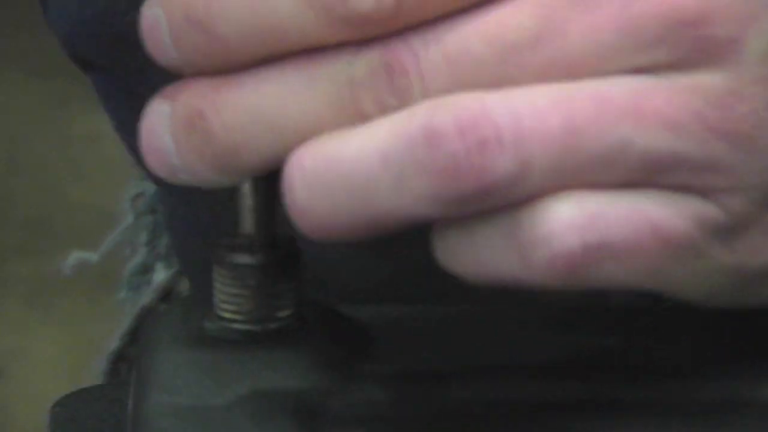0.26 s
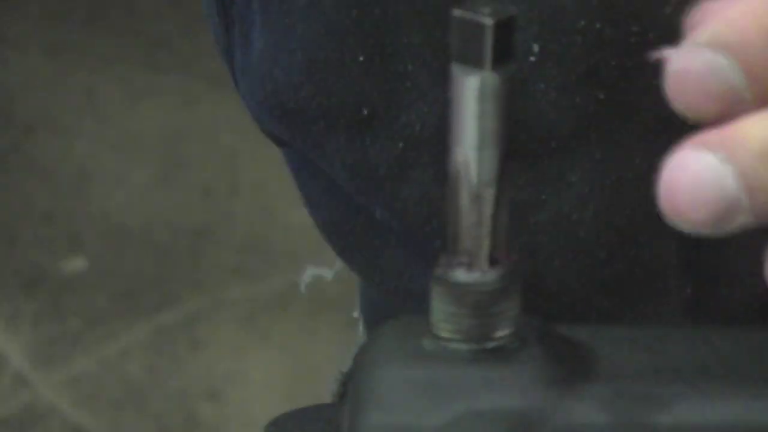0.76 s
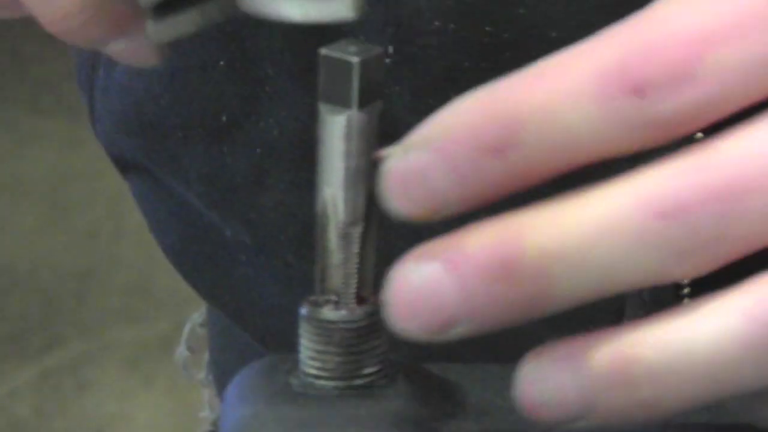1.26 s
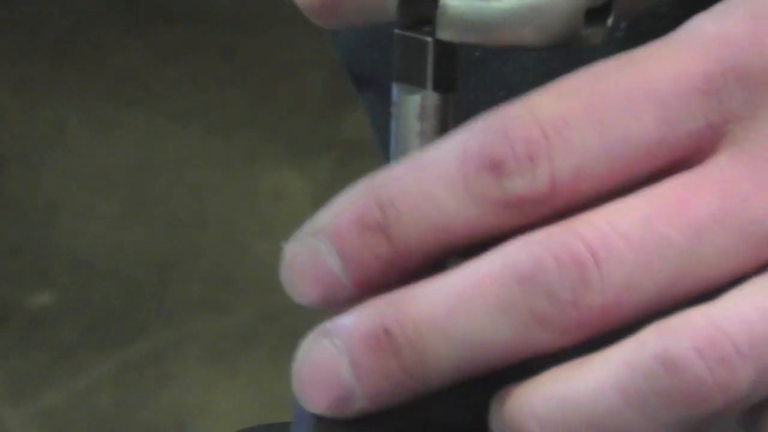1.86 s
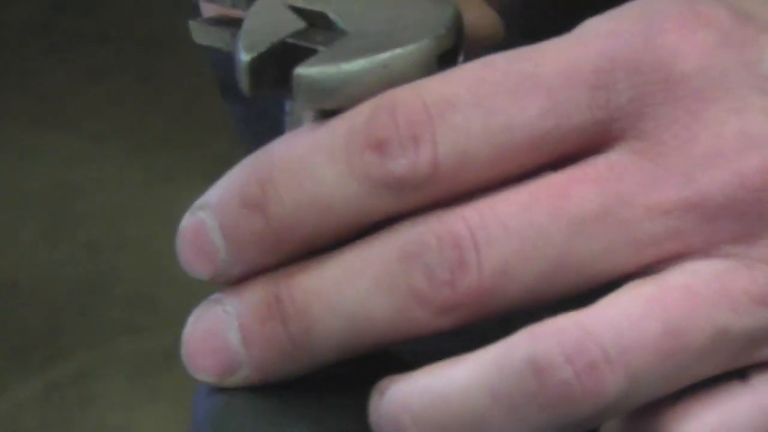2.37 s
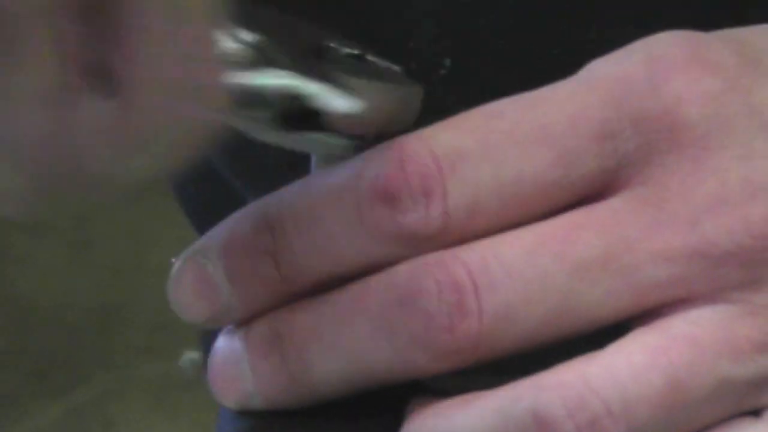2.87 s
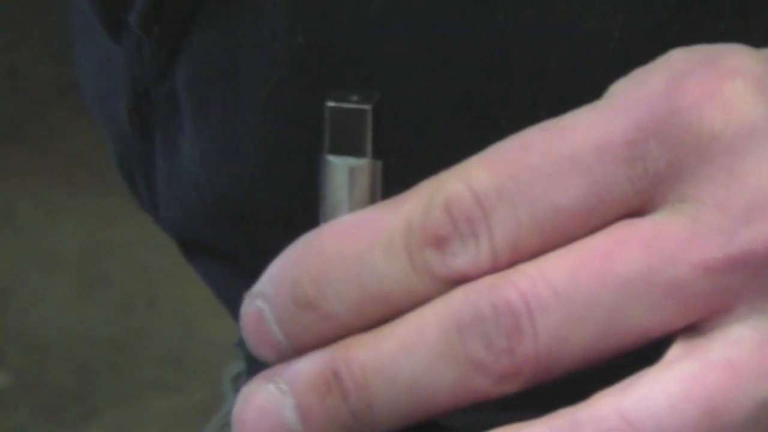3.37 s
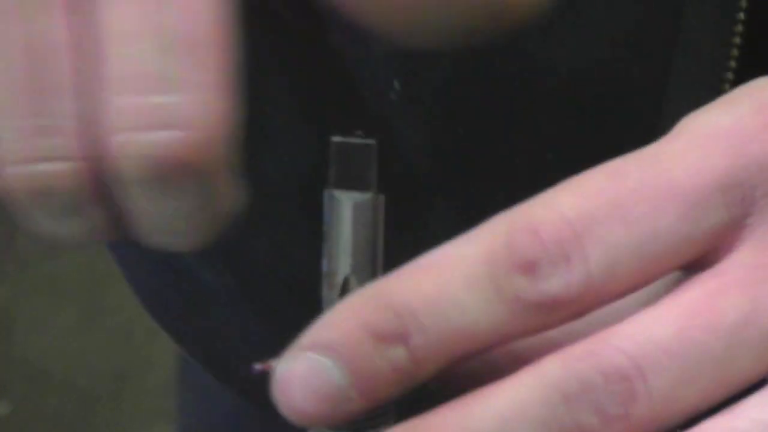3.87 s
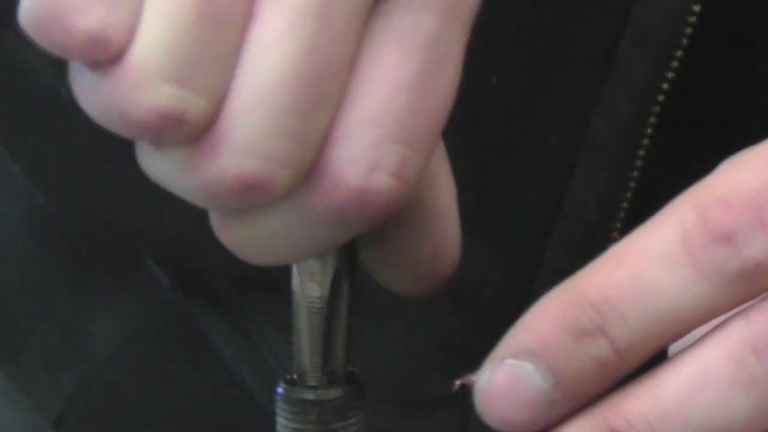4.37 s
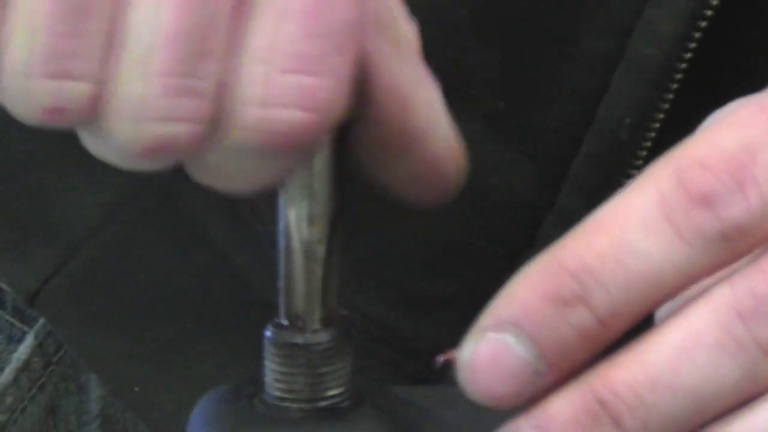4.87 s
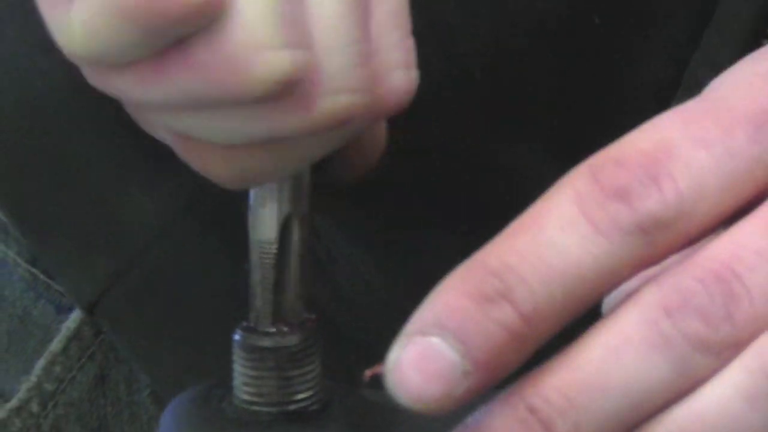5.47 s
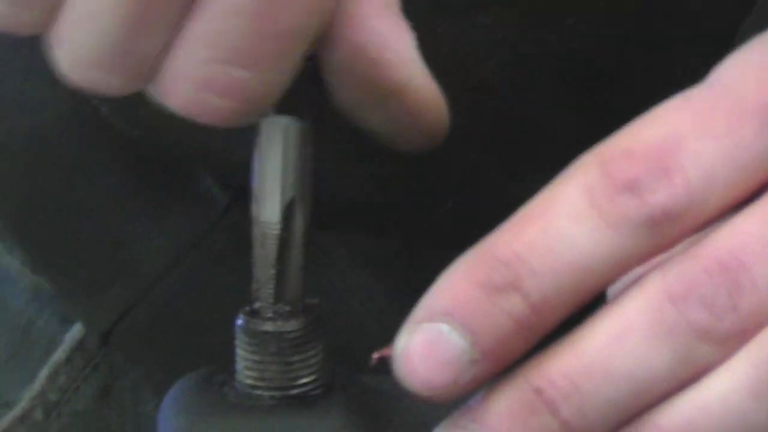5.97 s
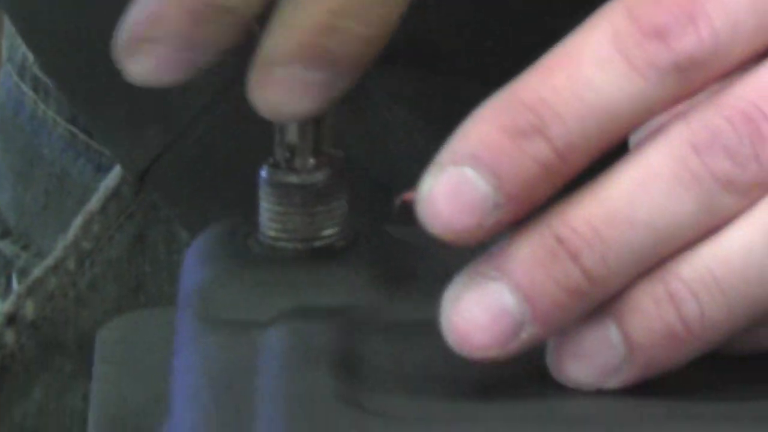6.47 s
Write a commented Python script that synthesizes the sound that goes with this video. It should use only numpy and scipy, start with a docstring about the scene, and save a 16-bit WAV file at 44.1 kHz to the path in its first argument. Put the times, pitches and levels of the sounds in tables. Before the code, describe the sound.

An adjustable wrench knocks and clinks on a steel tap in a hollow metal tank, then fingers twist it with small clicks and grinding scrapes.

```python
"""Turning a tap in an empty fuel tank

An adjustable wrench is picked up, seated on a steel tap, turned and laid down; then fingers twist the tap.
Knocks, catches and nudges: forced contact plus ring of the hollow sheet-metal tank (modes over a dense bed).
Grinding and sliding: random slips convolved with short decaying responses; groans: narrow noise at a mode.
Wrench: dull bumps on the bench, bright clinks of noise cracks and high modes; low pulses under a few blows.
Quiet workshop: coloured noise, faint tones.
"""
import sys
import numpy as np
from scipy import signal
from scipy.fft import rfft, irfft, next_fast_len
from scipy.io import wavfile
from scipy.ndimage import map_coordinates

SR = 44100
rng = np.random.default_rng(int(sys.argv[2]) if len(sys.argv) > 2 else 0)


def put_to_file(sound):
    """Save the sound as 16-bit audio at rate SR, in the file named by the first command-line argument."""
    columns = np.atleast_2d(sound).T  # one column per channel
    safe = np.clip(columns, -1, 1)
    whole_steps = np.round(safe * 32767)
    wavfile.write(sys.argv[1], SR, whole_steps.astype(np.int16))


N = 295911
TOP_HZ = 15900

# Wrench knocks on the tap. Each row: start in seconds, level before colour in dB, hardness in dB per octave
# of treble, weight in dB per octave of bass, ring against contact in dB.
WRENCH_KNOCKS = [(1.35, -31, 3.5, 0.1, -2.5), (1.622, -23.5, -1, 0, 0.5), (1.686, -31, 1.5, 2.5, 0),
                 (2.017, -25.5, -0.53, 0.5, 3), (2.391, -22, -2.5, -0.4, -4.5), (2.689, -53, -1.5, 9.5, 11),
                 (2.881, -39, -5.5, 3, -7.5), (3.054, -39, 0.5, .5, -5)]
# The tap catches in its thread, twisted by hand. Columns as for the wrench knocks.
THREAD_CATCHES = [(4.277, -46, 1.5, 5, -1.5), (4.308, -37, -.5, 1.5, -2), (4.447, -42.5, 1, 2.2, -8),
                  (5.457, -28, 0.5, 2, -4.5), (5.572, -48.5, 2, 6.5, -5), (5.631, -28.5, -0.46, -4.5, -7.5),
                  (5.963, -45, -3, 4, -2), (6.043, -37, 0, -3.5, 11), (6.128, -39.5, -2.5, 0.5, -1),
                  (6.212, -33.5, 0.2, -2, 10), (6.256, -32.5, -1.2, -6, -4), (6.369, -29, 0.8, -4, -1.5),
                  (6.411, -41, 4, 2, -7), (6.648, -47.5, -5, 3, -2)]
# Fingertips nudge the tap. Each row: start in seconds, level before colour in dB.
FINGER_NUDGES = [(0.29, -48), (0.425, -53), (4.735, -47.5), (5.063, -47), (5.377, -50), (5.422, -46.5)]
# The wrench bumps on the bench. Columns as for the wrench knocks.
BENCH_BUMPS = [(0.5235, -39, 3, 3, -12), (0.5305, -30.5, -3.5, -5, 2.5), (3.561, -35, -1.5, -0.85, -12.5),
               (3.654, -33, 0, 0, -20), (3.6665, -36, -1, 1.5, -11), (3.696, -35, 1.5, -1.5, -2.5)]
# Low push under blows on tap or bench. Each row: start in seconds, pulse gain in dB.
LOW_PUSHES = [(1.351, -33), (2.3902, -15.5), (3.667, -20)]
# The tap's teeth grind. Each row: start in seconds, length in seconds, relative final level in dB.
TOOTH_GRINDS = [(1.76, .15, -33.5), (1.95, 0.07, -39), (2.25, 0.1, -34.5), (2.47, 0.113, -34.5),
                (2.7, .16, -38.5), (2.92, 0.14, -38), (3.31, 0.071, -38.5), (4.33, 0.071, -33.5),
                (5.195, 0.034, -43.5), (5.49, 0.216, -33), (5.97, 0.062, -44), (6.12, 0.032, -32.5),
                (6.215, 0.056, -28.5), (6.41, 0.07, -29), (6.675, .03, -40.5)]
# The tight tap judders. Each row: start in seconds, length in seconds, final level in dB, tank mode in Hz.
TIGHT_GROANS = [(1.7, 0.2, -34.5, 491), (2.262, 0.05, -35.5, 415)]
# Steel slides on steel or bench. Each row: start in seconds, length in seconds, relative final level in dB.
STEEL_SLIDES = [(.47, 0.072, -43), (.64, 0.14, -42), (2.28, 0.024, -40), (2.37, 0.019, -26.5),
                (2.48, 0.089, -47.5), (2.7, 0.26, -47), (3.02, .035, -34), (3.305, 0.018, -45.5),
                (5.55, .03, -43.5), (5.61, 0.011, -38.5), (6.06, 0.07, -43.5), (6.21, .03, -41),
                (6.33, 0.035, -39.5)]
# Bright clinks of the wrench: jaw clicks, cracks of knocks, ring when laid down. Each row: start in seconds,
# crack gain in dB, ring gain in dB, left over right in dB, best-excited frequency in Hz.
WRENCH_CLINKS = [(1.1403, -18, -37.5, 0.5, 9100), (1.6244, -28.5, -57.5, 1, 6500),
                 (1.6857, -23, -52, 0, 7800), (2.0154, -44, -43, -5, 6500), (2.3912, -18, -60, 1, 8000),
                 (3.0582, -11, -33, 0.5, 9000), (3.493, -38, -51, 1, 3740), (3.656, -30, -31, 2, 5970),
                 (3.6682, -17, -27.5, 0, 7600), (3.6968, -14, -26.5, 2, 7100), (3.7305, -26, -44, -3, 7500)]

# Colour of each kind of blow: one level in dB per range, bass to treble.
KNOCK_RANGES_DB = [-10, -0.5, 0.5, -3.5, -6]
CATCH_RANGES_DB = [-10.5, 0, -1.5, -3, -11.5]
NUDGE_RANGES_DB = [-5.5, 10.5, 0, -19.5, -35]
BUMP_RANGES_DB = [12, 12, -1, -4.5, -13]
# Range centres in Hz.
RANGE_CENTRES_HZ = [200, 520, 1270, 3000, 8000]
# Borders between the ranges in Hz.
RANGE_EDGES_HZ = [300, 900, 1800, 5000]

# Clear modes of the tank's shell and air. Each row: frequency in Hz, level in dB.
TANK_CLEAR_MODES = [(188, -17), (285, -8), (323, -2), (415, 3), (460, -3), (485, 0), (506, 7), (690, -8),
                    (727, 1), (751, -4), (850, -3.5), (963, -5.5), (1085, -1), (1208, -3.5), (1259, 0.5),
                    (1292, -0.5), (1436, -28), (1480, -2), (1545, -10), (1632, 2.5), (1965, -9.5),
                    (2065, -18), (2164, -5), (2545, -7), (2762, -5.5), (2981, -8.5), (3270, -9.5),
                    (4450, -20), (6020, -27.5)]
# Dense weaker modes of the tank. Each row: frequency in Hz, level in dB per Hz.
TANK_BED = [(30, -23), (120, -9), (300, -2), (520, 5), (1000, 2.5), (1620, 5), (1800, -12), (2050, 5),
            (2370, -8.5), (2750, 1.5), (3080, -11), (3300, -3.5), (4400, -12.5), (5100, -24), (6200, -25.5),
            (8000, -25.5), (11000, -35), (16000, -60)]
# Modes of the tap itself. Each row: frequency in Hz, level in dB.
TAP_OWN_MODES = [(2019, -4), (2110, -4.5)]
# Clear modes of the bench. Each row: frequency in Hz, level in dB.
BENCH_CLEAR_MODES = [(86, -2.5), (150, -3.5), (172, 5.5), (212, -0.5), (268, 4), (388, 1.5), (455, 1),
                     (540, 3)]
# Dense modes of the bench. Each row: frequency in Hz, level in dB per Hz.
BENCH_BED = [(30, -39), (65, -25), (90, -2.5), (170, -2), (450, -1), (800, -6.5), (1500, -15), (1850, -30),
             (3000, -39), (7000, -50), (15000, -72)]
# Modes of the wrench. Each row: frequency in Hz, level in dB, echo decay by 60 dB in seconds.
WRENCH_MODES = [(3714, -7.5, 0.4), (5670, -1, 0.4), (5700, -17, 0.27), (7100, -9, .17), (8040, -1.5, 0.32),
                (9000, 3, 0.2), (10300, -11, 0.25), (11500, -17, .17), (12100, -16, .15),
                (13000, -5.5, .12)]
# Free ring of tank and room. Each row: frequency in Hz, unscaled decay by 60 dB in seconds.
FREE_RING_T60 = [(80, 1), (250, 0.76), (340, 0.62), (460, 0.63), (600, 0.76), (1300, 0.7), (2500, 0.71),
                 (4500, 0.51), (9000, 0.31), (15000, 0.22)]
# Damping by the hands. Each row: time in seconds, share of the free ring time left.
HAND_DAMPING = [(0, 0.86), (1.3, 0.87), (6.7, 0.86)]
# Stereo width of tank and contacts. Each row: frequency in Hz, side against mid in dB.
CONTACT_SIDE = [(40, 5), (150, -27), (600, -9), (2000, -7), (4500, -15.5), (10000, -4)]
# Rubbing steel. Each row: frequency in Hz, level in dB per Hz.
RUB_SPECTRUM = [(800, 5.5), (2000, 2), (3500, 1.5), (8000, -1.5), (12000, -9), (16000, -40)]
# Crack of a clink. Each row: frequency in Hz, level in dB per Hz.
CRACK_SPECTRUM = [(500, -28), (2500, -15), (5000, -7.5), (8000, 3), (11300, 5.0), (13500, -9), (16000, -9)]
# Workshop air. Each row: frequency in Hz, relative level in dB per Hz.
AIR_SPECTRUM = [(12, -41), (20, -21), (120, -4.5), (328, -8.5), (410, -8.5), (558, -10.5), (607, -8),
                (738, -13.5), (1530, -17), (1760, -30), (2020, -20), (2260, -30), (2670, -24),
                (3070, -32.5), (16000, -35.5)]
# Stereo width of the air. Each row: frequency in Hz, side against mid in dB.
AIR_WIDTH = [(60, -10), (110, -6), (200, -6.5), (380, -4.5), (700, -5), (1290, -4.5), (2380, -6),
             (4400, -14.5), (8120, -6), (15000, -2.5)]
# Faint tones. Each row: frequency in Hz, rms level in dB.
FAINT_TONES = [(91.5, -60), (215, -62), (414.5, -60.5), (511, -64.5), (1319, -69.5)]


def tap_knocks(nudge_ring_db=-9):
    """The tap tilts in its thread and strikes the tank: by wrench, by catching, or softly by fingertip."""
    nudges = [(s, db, 0, 0, nudge_ring_db) for s, db in FINGER_NUDGES]
    hard = blows(WRENCH_KNOCKS, KNOCK_RANGES_DB, TANK_BED, TANK_CLEAR_MODES, modes_db=1.0,
                 rise_180hz_s=0.0041, contact_t60_s=0.12, sustain=0.97, lowest_hz=55.4)
    light = blows(THREAD_CATCHES, CATCH_RANGES_DB, TANK_BED, TANK_CLEAR_MODES + TAP_OWN_MODES, modes_db=0.0,
                  rise_180hz_s=0.0077, contact_t60_s=0.1, sustain=0.92, lowest_hz=56)
    soft = blows(nudges, NUDGE_RANGES_DB, TANK_BED, TANK_CLEAR_MODES, modes_db=-5.0,
                 rise_180hz_s=0.0032, contact_t60_s=0.16, sustain=1.0, lowest_hz=56)
    return hard + light + soft


def grinding(ring_db=-7, contact_t60_s=0.047, low_hz=170, dull_hz=1300):
    """The cutting teeth catch and slip; the tank gives each slip its ring."""
    t = np.arange(SR) / SR
    body = vibration(TANK_BED, TANK_CLEAR_MODES, modes_db=-1, scatter_db=0.5, ripple_db=3.0)
    ring = amp(ring_db) * damped(body, sustain=0.66)
    dull = signal.butter(2, [low_hz, dull_hz], 'bandpass', fs=SR, output='sos')

    def response():
        contact = noise(TANK_BED, CONTACT_SIDE, SR) * amp(-60 * t / contact_t60_s)
        return signal.sosfilt(dull, ring + contact)

    force = strokes(TOOTH_GRINDS, attack_s=0.004, swell_db=-1.0, release_s=0.0094)
    force = force * slips(rate_hz=330, spread_db=2.5, clump_db=3)
    return played(force, response) * amp(-2.5)


def groaning(width_hz=75, swell_db=-4):
    """Slips under load crowd around a tank mode: narrow noise, a rough hollow note that fades as load eases."""
    m = next_fast_len(N)
    out, hz = np.zeros(N), np.fft.rfftfreq(m, 1 / SR)
    for s, length_s, db, centre_hz in TIGHT_GROANS:
        bell = 1 / (1 + (2 * (hz - centre_hz) / width_hz) ** 2)
        note = irfft(rfft(rng.standard_normal(m)) * bell, m)[:N]
        envelope = strokes([(s, length_s, db)], attack_s=0.029, swell_db=swell_db, release_s=0.073)
        out += envelope * unit(note)
    return out


def low_pushes(length_s=0.0017):
    """Low push under a few blows on tap or bench: one low pulse each, the same on both sides."""
    out, u = np.zeros((2, N)), np.arange(SR // 10) / SR / length_s
    pulse = u * (2 - u) * np.exp(-u)
    for s, db in LOW_PUSHES:
        add(out, s, amp(db) * np.array([pulse, pulse]))
    return out


def sliding(tail_db=-22, grain_t60_s=0.018):
    """Rubbing steel: many tiny slips give a fine gritty hiss with a weak ringing tail."""
    t = np.arange(SR // 2) / SR

    def hiss():
        return noise(RUB_SPECTRUM, CONTACT_SIDE, len(t))

    def response():
        return hiss() * amp(-60 * t / grain_t60_s) + amp(tail_db) * damped(hiss())

    force = strokes(STEEL_SLIDES, attack_s=0.0032, swell_db=13, release_s=0.024)
    force = force * slips(rate_hz=2200, spread_db=3.0, clump_db=5)
    return played(force, response) * amp(0.5)


def wrench_clinks(crack_t60_s=0.014, room_db=-25, direct_t60_s=0.085, echo_db=-9, width_hz=110, rise_s=0.00018):
    """A hard crack and the brief ring of the wrench's high modes; both linger diffusely in the room."""
    out, t = np.zeros((2, N)), np.arange(SR // 2) / SR
    hz, db, t60_s = np.transpose(WRENCH_MODES)[..., None]
    bells = 1 / (1 + (2 * (np.fft.rfftfreq(len(t), 1 / SR) - hz) / width_hz) ** 2)
    for s, crack_db, ring_db, pan_db, best_hz in WRENCH_CLINKS:
        scatter_db, phase = rng.standard_normal((len(hz), 2)).T[..., None]
        strength = amp(db + scatter_db - 4.6 * np.abs(np.log2(hz / best_hz)))
        tones = strength * np.sin(2 * np.pi * (hz * t + phase))
        direct = np.sum(tones, 0) * amp(-60 * t / direct_t60_s)
        # echo: one narrow noise band per mode
        white = noise([(1000, 0)], [(1000, -7)], len(t))
        fuzzy = unit(irfft(rfft(white)[:, None] * bells, len(t)))
        echo = amp(echo_db) * np.sum(fuzzy * strength * amp(-60 * t / t60_s), 1)
        burst = noise(CRACK_SPECTRUM, [(1000, -5)], len(t))
        crack = burst * amp(-60 * t / crack_t60_s) + amp(room_db) * damped(burst)
        clink = amp(crack_db) * crack + amp(ring_db) * (direct + echo)
        onset = 1 - np.exp(-t / rise_s)
        add(out, s, clink * onset * amp([[pan_db / 2], [-pan_db / 2]]))
    return out


def bench_thumps():
    """The heavy wrench meets the bench, whose low modes give dull, hollow bumps."""
    return blows(BENCH_BUMPS, BUMP_RANGES_DB, BENCH_BED, BENCH_CLEAR_MODES, modes_db=-4.0,
                 rise_180hz_s=0.002, contact_t60_s=0.13, sustain=1.0, lowest_hz=94)


def workshop(air_db=-51):
    """Steady coloured room noise with faint tones whose phases drift at random."""
    t = np.arange(N) / SR
    tones = np.zeros(N)
    for hz, db in FAINT_TONES:
        drift_rad = np.cumsum(rng.standard_normal(N)) * 0.0172
        tones += amp(db) * np.sqrt(2) * np.sin(2 * np.pi * hz * t + drift_rad)
    return amp(air_db) * noise(AIR_SPECTRUM, AIR_WIDTH, N) + tones


def blows(rows, colour_db, spectrum, modes, modes_db, rise_180hz_s, contact_t60_s, sustain, lowest_hz):
    """Each blow: short forced contact plus long ring; hardness tilts up its treble, weight its bass."""
    out, t, hz = np.zeros((2, N)), np.arange(SR) / SR, np.arange(SR // 2 + 1)
    below = [0 * hz] + [1 / (1 + (hz / edge) ** 10) for edge in RANGE_EDGES_HZ] + [0 * hz + 1]
    ranges = np.diff(below, axis=0)[:, None]
    octaves = np.log2(RANGE_CENTRES_HZ / np.median(RANGE_CENTRES_HZ))
    # bass builds up more slowly than treble
    slowness = (180 / np.array(RANGE_EDGES_HZ + [TOP_HZ])[:, None, None]) ** 0.38
    onset = 1 - np.exp(-np.minimum(t / (rise_180hz_s * slowness), 10) ** 2)
    fade = np.minimum(1, 10 * (1 - t)) ** 2
    first = round(.03 * SR)  # levels are set over the first 30 ms
    for s, db, hardness, weight, ring_db in rows:
        tilt_db = hardness * np.maximum(octaves, 0) + weight * np.maximum(-octaves, 0)
        levels_db = db + np.array(colour_db) + tilt_db
        contact = vibration(spectrum, modes, modes_db - 0.5) * amp(-60 * t / contact_t60_s) * chatter()
        held = sustain * np.interp(s, *np.transpose(HAND_DAMPING))
        ring = amp(ring_db) * damped(vibration(spectrum, modes, modes_db), held)
        parts = irfft(rfft(contact + ring) * ranges, SR) * onset
        gains = amp(levels_db) / np.sqrt(np.mean(parts[..., :first] ** 2, axis=(1, 2)))
        add(out, s, np.tensordot(gains, parts, 1) * fade)
    highpass = signal.butter(3, lowest_hz, 'highpass', fs=SR, output='sos')
    return signal.sosfilt(highpass, out)


def vibration(spectrum, modes, modes_db, scatter_db=1.0, spread_rad=0.32, ripple_db=4.5):
    """One undamped second of a body: clear modes, newly weighted each time, over a dense bed."""
    hz, db = np.transpose(modes)
    size, phase, skew = rng.standard_normal((len(hz), 3)).T
    angle_rad = 2 * np.pi * phase + spread_rad * np.outer([1, -1], skew)
    lines = np.zeros((2, SR // 2 + 1), complex)
    lines[:, np.round(hz).astype(int)] = amp(db + scatter_db * size) * np.exp(1j * angle_rad)
    bed = rfft(noise(spectrum, CONTACT_SIDE, SR)) * ripple(np.arange(SR // 2 + 1), ripple_db)
    return unit(unit(irfft(bed, SR)) + amp(modes_db) * unit(irfft(lines, SR)))


def ripple(hz, depth_db, modes_per_octave=22):
    """Random peaks and dips of a dense set of modes, drawn anew for each contact."""
    place = np.log2(1 + hz / 100) * modes_per_octave
    return amp(depth_db * map_coordinates(rng.standard_normal(int(place[-1]) + 4), [place], order=1))


def damped(x, sustain=1):
    """Each frequency decays at its own rate, the top treble fastest."""
    hz, t, z = signal.stft(x, SR, nperseg=256)
    t60_s = sustain * along(FREE_RING_T60, hz)[:, None]
    return signal.istft(z * amp(-60 * t / t60_s), SR, nperseg=256)[1][:, :x.shape[1]]


def chatter(depth_db=3.0, rate_hz=300):
    """Level flickers at random within one blow as the parts bounce against each other."""
    knots = rng.standard_normal(int(rate_hz) + 4)
    return amp(depth_db * map_coordinates(knots, [np.arange(SR) * rate_hz / SR], order=1))


def strokes(rows, attack_s, swell_db, release_s):
    """Rubbing force: each stroke sets in, moves by swell_db to its final level and lets go."""
    t, force = np.arange(N) / SR, np.zeros(N)
    for s, length_s, db in rows:
        attack = np.clip((t - s) / attack_s, 0, 1)
        swell = amp(swell_db * (np.clip((t - s) / length_s, 0, 1) - 1))
        release = np.exp(-np.maximum(t - s - length_s, 0) / release_s)
        force += amp(db) * attack * swell * release
    return force


def slips(rate_hz, spread_db, clump_db):
    """Tiny stick-slip contacts at random times, of unequal size, strong ones in clumps; rms 1."""
    sizes = amp(spread_db * rng.standard_normal(N) + clump_db * wobble(55))
    hits = rng.random(N) < rate_hz / SR
    return unit(hits * rng.choice([-1, 1], N) * sizes)


def played(force, response, count=4):
    """Slips land on a few spots; response() gives each spot a sound of its own."""
    spot, out = rng.integers(count, size=N), np.zeros((2, N))
    for k in range(count):
        sound = response()
        sound = sound / np.linalg.norm(sound[0])
        out += signal.fftconvolve((force * (spot == k))[None], sound, axes=1)[:, :N]
    return out


def wobble(rate_hz):
    """Random curve, linear between rate_hz knots a second."""
    knots = rng.standard_normal(int(N * rate_hz / SR) + 4)
    return map_coordinates(knots, [np.arange(N) * rate_hz / SR], order=1)


def noise(spectrum, side, size):
    """Coloured stereo noise of rms 1."""
    m = next_fast_len(size)
    hz = np.fft.rfftfreq(m, 1 / SR)
    mid, wide = rfft(rng.standard_normal((2, m))) * amp(along(spectrum, hz))
    wide = wide * amp(along(side, hz))
    return unit(irfft(np.array([mid + wide, mid - wide]), m)[:, :size])


def amp(db):
    """Decibels to gain."""
    return 10 ** (np.asarray(db) / 20)


def unit(x):
    """Scale to rms 1."""
    return x / np.sqrt(np.mean(x ** 2) + 1e-20)


def along(points, hz):
    """Interpolate (Hz, value) points on a log axis."""
    f, v = np.transpose(points)
    return np.interp(np.log(hz + 1), np.log(f + 1), v)


def add(out, s, x):
    """Mix x into out from s seconds on."""
    part = out[:, round(s * SR):][:, :x.shape[1]]
    part += x[:, :part.shape[1]]


def scene():
    """Sum all sources; tank and bench work leans a little to the right."""
    work = tap_knocks() + grinding() + groaning() + low_pushes() + sliding() + bench_thumps()
    return work * amp([[-.6], [.6]]) + wrench_clinks() + workshop()


def record(dry):
    """Nothing from TOP_HZ upward passes."""
    m = next_fast_len(N + SR // 2)
    passed = np.fft.rfftfreq(m, 1 / SR) < TOP_HZ
    return irfft(rfft(dry, m) * passed, m)[:, :N]


dry = scene()
out = record(dry)
put_to_file(out)
```